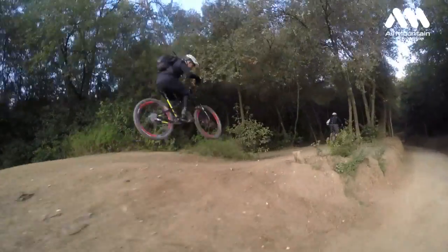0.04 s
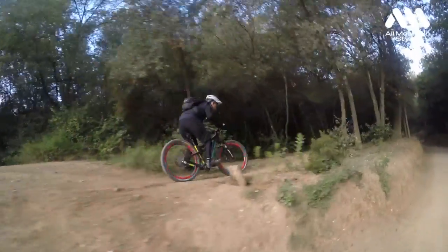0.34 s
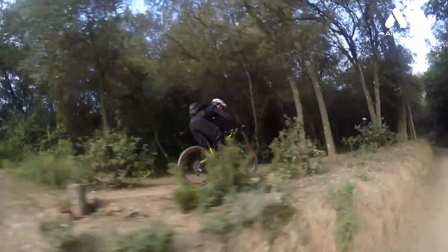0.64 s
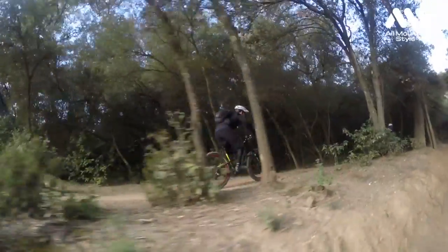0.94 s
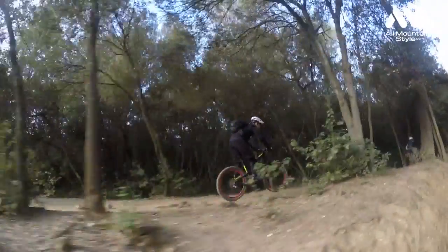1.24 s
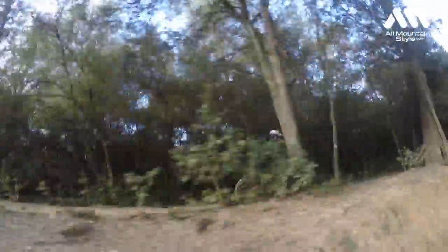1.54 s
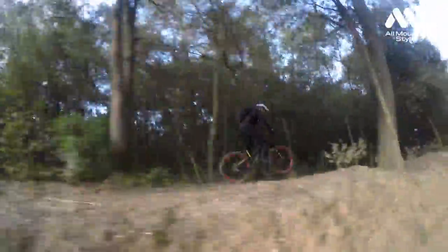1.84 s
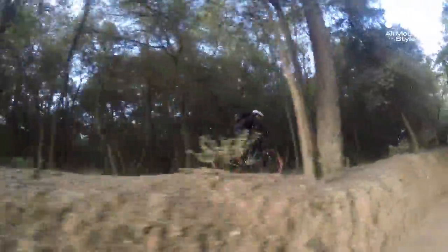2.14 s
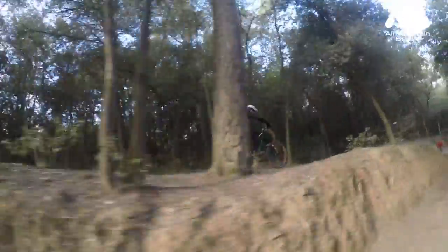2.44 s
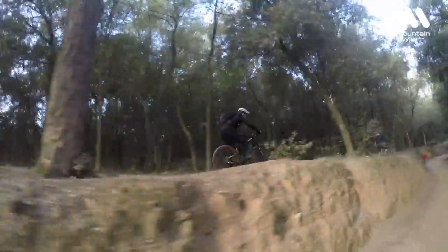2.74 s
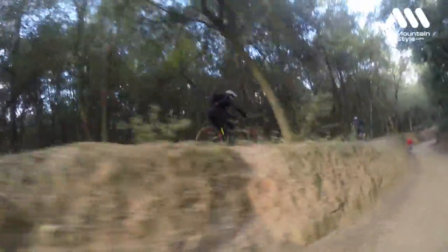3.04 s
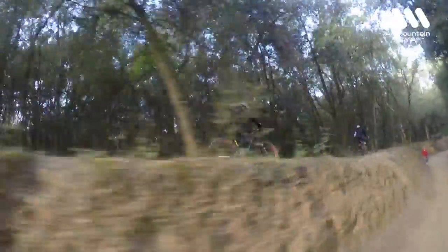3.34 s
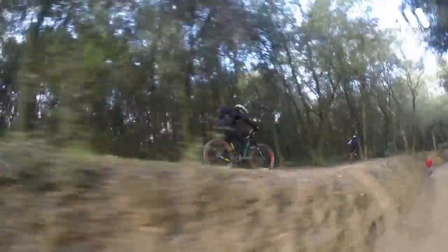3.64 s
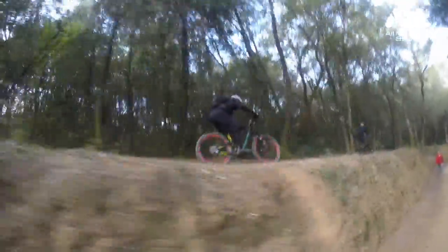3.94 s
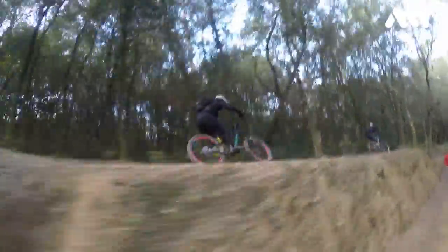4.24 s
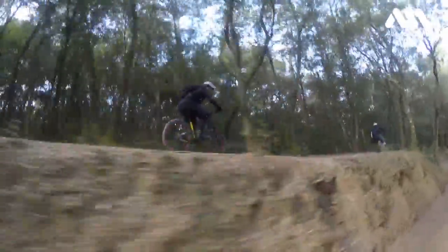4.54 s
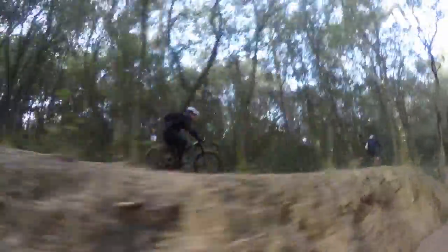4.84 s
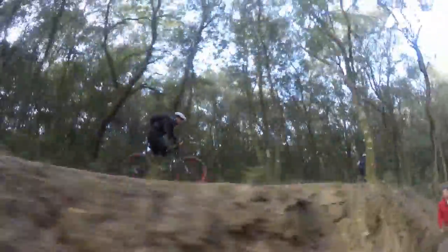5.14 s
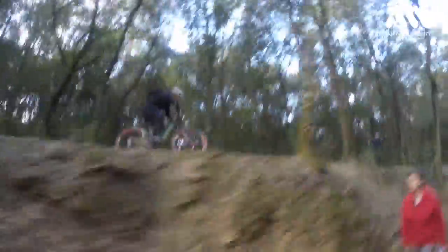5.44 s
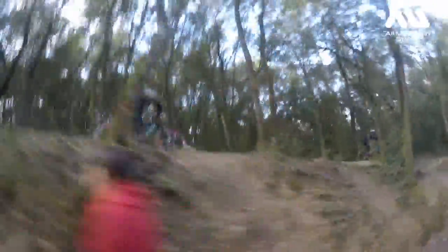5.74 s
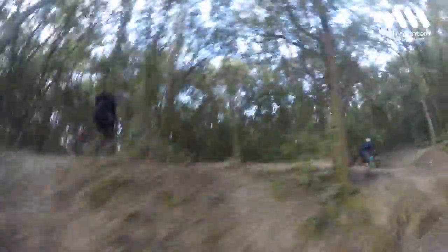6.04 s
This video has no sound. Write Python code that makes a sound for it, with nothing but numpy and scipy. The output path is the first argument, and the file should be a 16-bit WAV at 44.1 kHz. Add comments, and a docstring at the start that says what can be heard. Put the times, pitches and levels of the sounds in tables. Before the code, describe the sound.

Wind buffets a camera on a moving mountain bike as tyres crunch over dry dirt, with small clacks and thin brake squeaks.

```python
"""Mountain bike tyres crunch over dry dirt and spray grit, close to a camera riding on the bike.
The place is a woodland trail; a rider alongside lands a jump and throws up loose soil. Stones tick,
chains and frames clack, and a brake squeaks thinly, with a short echo from the trees. Wind buffets
the camera's microphone, hardest near the end, and its resonant case colours the noise and clatter."""
import sys
import numpy as np
from scipy import signal
from scipy.fft import rfft, irfft
from scipy.io import wavfile

SR = 44100
rng = np.random.default_rng(int(sys.argv[2]) if len(sys.argv) > 2 else 0)


def store_wav(level_fs):
    """Save 16-bit WAV to argv[1]."""
    pcm = np.round(np.clip(np.atleast_2d(level_fs), -1, 1) * 32767)
    wavfile.write(sys.argv[1], SR, pcm.T.astype(np.int16))


N = 269010
TIME = np.arange(N) / SR


def amp(db):
    """Decibels to gain."""
    return 10 ** (np.asarray(db) / 20)


def unit_rms(x):
    """Scales to rms 1."""
    return x / np.sqrt(np.mean(x ** 2) + 1e-20)


def with_energy(x, seconds):
    """Scales a hit to the energy of a sound of rms 1 lasting that many seconds."""
    return x * np.sqrt(seconds * SR / np.sum(x ** 2))


def follow(rows):
    """Gain at every sample from rows of (time [s], level [dB])."""
    return amp(np.interp(TIME, *np.transpose(rows)))


def bump(s, length):
    """A smooth bump of height 1 that peaks at time s."""
    return np.exp(-(2 * (TIME - s) / length) ** 2)


def swells(rows):
    """Smooth bumps of gain from rows of (peak time [s], length [s], level [dB])."""
    return sum(amp(db) * bump(s, length) for s, length, db in rows)


def add(mix, s, sound):
    """Adds a sound at time s."""
    part = mix[max(round(s * SR), 0):][:len(sound)]
    part += sound[:len(part)]


def wander(rate_hz):
    """Smooth random drift of rms 1, moving at up to about rate_hz."""
    lowpass = np.exp(-(np.fft.rfftfreq(N, 1 / SR) / rate_hz) ** 2)
    return unit_rms(irfft(rfft(rng.standard_normal(N)) * lowpass, N))


def grains(per_s, spread_db):
    """Clicks at random times and of random size."""
    size = amp(spread_db * np.minimum(rng.exponential(1, N), 5))
    return unit_rms(size * rng.standard_normal(N) * (rng.random(N) < per_s / SR))


# Resonances and a hollow of the case around the microphone: (frequency [Hz], width [Hz], gain [dB])
CASE_RESONANCES = [(1220, 170, 5), (2137, 330, 5.5), (2458, 99, 4.5), (3457, 57, 5), (4180, 104, 4.5),
                   (4590, 280, -6), (4924, 740, 5.5)]

def through_case(x, spectrum, tilt_db=0):
    """Gives x a source's spectrum, a treble tilt per octave and the resonances of the camera case."""
    bins = np.fft.rfftfreq(16384, 1 / SR)
    hz, levels = np.transpose(spectrum)
    db = np.interp(np.log2(bins + 1), np.log2(hz), levels)
    db += tilt_db * np.log2(np.clip(bins, 2300, 9000) / 4000)
    db += sum(peak / (1 + (2 * (bins - f) / width) ** 2) for f, width, peak in CASE_RESONANCES)
    log_gain = np.log(amp(np.r_[db, db[-2:0:-1]]))
    taps = np.fft.ifft(np.exp(np.conj(signal.hilbert(log_gain)))).real  # minimum phase, so causal
    return signal.oaconvolve(x, taps[:min(len(x), len(bins))])[:len(x)]


def noise(spectrum, flutter=1):
    """Noise of rms 1 heard through the case; flutter is a gain applied before the filter."""
    return unit_rms(through_case(rng.standard_normal(N) * flutter, spectrum))


# Noise floor at the camera: (frequency [Hz], relative level [dB])
HISS_SPECTRUM = [(200, -8), (4000, 21), (8000, -32), (10700, 6), (12000, -10), (12800, 14.5), (14000, 4),
                 (15200, 6)]

def hiss():
    """A faint, steady hiss lies under everything."""
    return amp(-63) * noise(HISS_SPECTRUM)


def woods(x, wet_db, t60, blur):
    """Trunks and banks throw a sound back; with blur, riding past them smears its pitch."""
    t = np.arange(SR // 2) / SR
    taps = rng.standard_normal(len(t)) * amp(-60 * t / t60) * (1 - np.exp(-t / 0.0042))
    echo = signal.fftconvolve(x, taps / np.linalg.norm(taps))[:N]
    return amp(wet_db) * echo * (1 + blur * wander(520)) / np.hypot(1, blur)


# Air over the microphone, growing as the bike gathers speed: (time [s], relative level [dB])
AIRFLOW = [(0, -58.5), (1.0, -57), (2.3, -60), (3.15, -58.5), (4.3, -48), (5.2, -53), (6.1, -41.5)]
# Gusts right on the microphone: (peak time [s], length [s], level [dB])
GUSTS = [(0.05, 0.057, -27.5), (.135, .035, -30), (.215, 0.032, -29.5), (0.315, 0.1, -24.5),
         (.465, 0.027, -31), (.585, 0.06, -30.5), (.66, 0.05, -25), (.75, .05, -27.5), (.84, .04, -31.5),
         (0.975, 0.082, -21.5), (1.08, 0.065, -26), (1.33, .03, -29.5), (1.425, 0.023, -29),
         (1.555, 0.054, -25.5), (1.68, 0.06, -31.5), (1.85, 0.094, -30.5), (1.98, 0.13, -31),
         (2.15, 0.17, -29.5), (2.34, 0.073, -25), (2.49, 0.051, -26), (2.6, 0.063, -26.5),
         (2.69, 0.15, -28.5), (2.83, 0.086, -31), (3.0, 0.033, -28.5), (3.085, 0.073, -22.5),
         (3.28, 0.18, -23), (3.47, 0.18, -19.5), (3.61, 0.085, -27), (3.79, 0.041, -28.5),
         (3.905, 0.019, -25), (4.02, .05, -25), (4.115, 0.13, -19), (4.275, .07, -25), (4.43, 0.036, -27.5),
         (4.57, 0.067, -23), (4.675, 0.063, -23), (4.92, 0.09, -25), (5.02, .05, -22), (5.14, 0.1, -20.5),
         (5.395, 0.24, -13.5), (5.54, 0.061, -20), (5.635, 0.075, -19), (5.77, 0.14, -15.5),
         (5.93, 0.088, -17.5), (6.045, 0.077, -18.5)]
# Lulls in the steady wind; a negative depth is a surge: (centre time [s], length [s], depth [dB])
LULLS = [(1.45, 0.38, 5.5), (1.75, .1, -3.5), (2.25, 0.069, 1), (2.95, .1, 2), (3.13, .06, 12),
         (3.803, 0.48, 7), (4.207, 0.055, 7), (4.425, 0.18, 7), (4.79, 0.11, 1), (5.265, .05, 4),
         (5.856, 0.057, 11)]
# Strength of the turbulence at the microphone: (time [s], relative level [dB])
TURBULENCE_LEVEL = [(0, -55), (.4, -53), (.6, -54.5), (1.05, -52), (1.18, -50), (1.4, -53), (1.56, -44.5),
                    (1.68, -56.5), (1.9, -48), (2.45, -50.5), (2.53, -44.5), (2.62, -50.5), (2.97, -49.5),
                    (3.1, -54.5), (3.5, -49.5), (3.92, -48), (4.12, -50.5), (4.45, -46), (4.65, -49.5),
                    (4.9, -48.5), (5.05, -47), (5.45, -46.5), (5.75, -45.5), (6.05, -45.5)]
# Slow swirls and lumpy turbulence at the microphone: (frequency [Hz], relative level [dB])
SWIRL_SPECTRUM = [(10, -23), (22, -10), (29, 9), (37, 9), (46, -12), (60, -9), (150, -105)]
TURBULENCE_SPECTRUM = [(25, -13.5), (50, -1), (75, 1.5), (100, -5), (150, -14), (220, -18.5), (330, -28),
                       (600, -38), (1500, -35), (5000, -85)]

def wind(shed_hz=18, shed_jitter=0.15):
    """Eddies shed by the camera rock the microphone, swell in gusts, ease in lulls and break up."""
    flow, gusts = unit_rms(follow(AIRFLOW)), swells(GUSTS)
    calm = amp(-sum(db * bump(s, length) for s, length, db in LULLS))
    sway_hz = shed_hz * np.exp(shed_jitter * wander(9.06))
    sway = unit_rms(np.sin(2 * np.pi * np.cumsum(sway_hz) / SR))
    swirl = noise(SWIRL_SPECTRUM)
    turbulence = noise(TURBULENCE_SPECTRUM, flutter=amp(wander(23)))
    sway_gain = np.hypot(amp(-30.5) * flow * calm, gusts)
    swirl_gain = np.hypot(amp(-42) * flow ** 0.21 * calm, amp(-17) * gusts)
    turbulence_gain = amp(1.52) * follow(TURBULENCE_LEVEL) * calm ** 0.3
    return sway_gain * sway + swirl_gain * swirl + turbulence_gain * turbulence


def disc(hz, edge_s=0.0019):
    """The brake disc sings along a pitch curve, starting and stopping quickly."""
    edges = signal.windows.tukey(len(hz), 2 * edge_s * SR / len(hz))
    return unit_rms(np.sin(2 * np.pi * np.cumsum(hz) / SR) * edges)


# Thin brake squeaks among the trees: (time [s], length [s], level [dB], starting pitch [Hz])
SQUEAKS = [(2.747, 0.014, -41.5, 14100), (2.786, 0.017, -40.5, 14040), (2.867, .018, -53, 13950),
           (2.903, 0.022, -42.5, 13900), (2.973, .011, -50, 14200), (3.151, 0.011, -49, 14200),
           (3.246, 0.021, -40.5, 14000), (3.462, 0.016, -40, 13700), (3.482, 0.022, -36, 14170),
           (3.532, .027, -36.5, 14000), (3.625, 0.026, -38.5, 14100), (5.035, .022, -54, 14250)]
# The pad rasping on the disc without catching: (time [s], length [s], peak level [dB])
RASPS = [(3.16, 0.29, -46.5), (5.04, 0.089, -63)]

def brake(grip_hz=14400, settle_s=0.013, rasp_hz=14200, rasp_fade_db=15):
    """The pad catches the disc in squeaks that climb as it grips; where it slips, it rasps."""
    out, waver, chatter = np.zeros(N), wander(400), amp(3 * wander(60))
    for s, length, db, start_hz in SQUEAKS:
        t = np.arange(round(length * SR)) / SR
        hz = grip_hz + (start_hz - grip_hz) * np.exp(-(t / settle_s) ** 2)
        add(out, s, amp(db) * disc(hz + 95 * waver[round(s * SR):][:len(t)]))
    for s, length, db in RASPS:
        during = (TIME >= s) & (TIME < s + length)
        swell = amp(db - rasp_fade_db * abs(np.linspace(-1, 1, during.sum())))
        add(out, s, swell * chatter[during] * disc(rasp_hz + 260 * waver[during]))
    return out


# Modes of the bike's frame: (frequency [Hz], gain against the contact [dB], t60 [s])
FRAME_MODES = [(2310, -18, .02), (2930, 3, 0.016), (3950, -5, 0.021), (4880, -3, 0.0079),
               (10900, -13, .007)]
# A clack on the bike, heard from the camera: (frequency [Hz], relative level [dB])
CLACK_SPECTRUM = [(200, -21.5), (700, -21), (1500, -25), (2600, -0.5), (4800, 1), (6500, -5), (8500, -22),
                  (12000, -22.5), (15000, -32)]

def frame_clack(contact, tilt_db):
    """A contact and the short frame modes that it rings, heard through the case."""
    out = contact
    for hz, db, t60 in FRAME_MODES:
        radius = np.exp(-np.log(1000) / (t60 * SR))
        pole = radius * np.exp(2j * np.pi * hz / SR)
        out = out + amp(db) * 2 * signal.lfilter([1 - radius], [1, -pole], contact).real
    return through_case(out, CLACK_SPECTRUM, tilt_db)


def chain_rattle(level_db=-73, decay_s=0.0029):
    """The chain ticks lightly against the frame at random as the trail shakes it."""
    t = np.arange(1024) / SR
    shakes = signal.oaconvolve(abs(grains(per_s=22, spread_db=-1.5)), np.exp(-t / decay_s))[:N]
    return amp(level_db) * unit_rms(frame_clack(shakes * rng.standard_normal(N), tilt_db=11))


# Knocks of chain and frame, close by: (time [s], level [dB], decay [s], brightness [dB/octave])
KNOCKS = [(0.2945, -33.5, 0.0026, 1.5), (0.3713, -41, 0.0086, -4), (.392, -44.5, 0.022, -6),
          (.402, -35, 0.0014, 5), (.427, -46, .003, 3), (0.459, -28, 0.0022, 6.5), (1.3806, -44, .001, -24),
          (1.388, -36, 0.002, -27), (1.481, -51, 0.0018, -17), (1.4827, -40, 0.0025, -18),
          (1.515, -46, 0.0015, -13), (1.5192, -40, .003, -18), (1.8777, -43, 0.0018, -27),
          (2.351, -42, 0.0035, -24), (2.461, -43, 0.0063, -22), (3.017, -42, 0.0031, -25),
          (3.3419, -34.5, 0.0026, -24), (3.585, -37.5, .003, -34), (5.566, -38, 0.0025, -20),
          (5.861, -39, 0.004, -24)]

def knocks(rattle=0.055, rattle_s=0.015):
    """Each knock is a brief burst of contacts that rings the frame and dies into a faint rattle."""
    out, t = np.zeros(N), np.arange(4096) / SR
    for s, db, decay_s, tilt_db in KNOCKS:
        burst = rng.standard_normal(len(t)) * (np.exp(-t / decay_s) + rattle * np.exp(-t / rattle_s))
        add(out, s, amp(db) * with_energy(frame_clack(burst, tilt_db), decay_s))
    return out


# A stone or chain link striking near the camera: (frequency [Hz], relative level [dB])
TICK_SPECTRUM = [(1000, -21), (3000, 5), (5000, 7), (6800, 6), (8500, -3.5), (11500, -10), (15000, -6)]

def tick(decay_s, tilt_db=0):
    """A small, hard contact gives one dry, bright burst of noise."""
    t = np.arange(2048) / SR
    burst = rng.standard_normal(len(t)) * np.exp(-t / decay_s)
    return with_energy(through_case(burst, TICK_SPECTRUM, tilt_db), decay_s)


# Chain on frame, close by: (time [s], level [dB], pitch [Hz], click against the ping [dB])
CHAIN_TAPS = [(3.2415, -44, 4850, -9), (3.483, -48, 4850, 8), (3.6706, -46, 5100, 3),
              (3.7394, -49, 4820, -7), (5.6155, -48.5, 4750, -1), (5.7743, -42, 4860, -8),
              (5.8331, -46.5, 5030, 0), (5.869, -53, 4870, 4), (5.9, -47.5, 4800, 3.5)]

def chain_taps(ring_s=0.0041, rise_s=0.00081):
    """A harder tap of the chain makes a dry click and a short metallic ping."""
    out, t = np.zeros(N), np.arange(2048) / SR
    envelope = np.exp(-t / ring_s) * (1 - np.exp(-t / rise_s))
    for s, db, hz, click_db in CHAIN_TAPS:
        ping = np.sqrt(2) * np.sin(2 * np.pi * hz * t) * envelope
        add(out, s, amp(db) * (ping + amp(click_db) * tick(decay_s=0.0023)))
    return out


# Small stones on the trail below the camera: (time [s], level [dB], brightness [dB/octave])
STONES = [(0.166, -47, -5), (.437, -51, 8), (.5253, -52, -1), (0.582, -49.5, -5), (.8515, -57, 13),
          (1.12, -47, -2), (1.1505, -52, 10), (2.2025, -52, 1), (3.264, -51, 4), (3.3487, -52, 12),
          (3.714, -52, 6), (3.9784, -50, 1), (5.7659, -56, 2), (5.921, -45, -7)]

def stones():
    """Each stone flicked off the tread ticks once."""
    out = np.zeros(N)
    for s, db, tilt_db in STONES:
        add(out, s, amp(db) * tick(decay_s=0.0031, tilt_db=tilt_db))
    return out


# Soil off the tyres of the rider alongside: (frequency [Hz], relative level [dB])
DUST_SPECTRUM = [(2400, -13), (3100, 5.5), (3550, -26), (4400, -8), (4900, 0), (5300, -6.5), (6000, -17),
                 (8000, -19), (10500, -18), (15000, -19)]

def dust(landing_s=0.19, peak_db=-56, rise_db_per_s=22, fall_db_per_s=6):
    """Loose dry soil thrown by the landing patters down and thins out."""
    since = TIME - landing_s
    gain = amp(peak_db + np.minimum(rise_db_per_s * since, -fall_db_per_s * since))
    return gain * unit_rms(through_case(grains(per_s=3400, spread_db=1.5), DUST_SPECTRUM))


# Tyres thumping into the trail: (peak time [s], length [s], level [dB])
THUMPS = [(.38, 0.06, -58.5), (2.2, 0.15, -62.5), (3.47, 0.11, -60), (4.29, 0.12, -61),
          (5.41, 0.075, -54.5), (5.74, .22, -62.5)]
# A tyre casing's dull thud, heard from the bike: (frequency [Hz], relative level [dB])
THUMP_SPECTRUM = [(100, -16), (250, 7), (450, 3.5), (800, -2), (1400, -2), (2500, -17), (6000, -50)]

def thumps():
    """The tyre casings thud as they are pressed into the ground."""
    return swells(THUMPS) * noise(THUMP_SPECTRUM)


# Crushing of dirt and roar of the knobs, just below the camera: (time [s], relative level [dB])
CRUSH_LEVEL = [(0.0, -52.5), (0.13, -50.5), (0.37, -46.5), (0.6, -50.5), (.8, -49.5), (1.33, -50.5),
               (1.42, -48), (1.56, -45.5), (1.72, -49), (1.97, -44.5), (2.11, -45), (2.23, -44.5),
               (2.37, -45), (2.54, -47), (2.7, -44), (2.9, -43), (3.5, -44), (3.68, -41.5), (3.95, -45),
               (4.3, -43), (4.64, -43), (4.93, -44.5), (5.16, -42.5), (5.28, -45.5), (5.57, -42.5),
               (5.75, -43.5), (6.05, -45)]
ROAR_LEVEL = [(0, -67), (.2, -60.5), (.8, -61), (1.25, -58.5), (1.57, -54.5), (1.75, -55), (2.18, -55),
              (2.5, -58), (2.92, -54.5), (3.4, -56.5), (3.7, -54), (3.98, -54.5), (4.3, -54.5), (4.9, -55),
              (5.5, -54), (6.05, -53)]
# Bites into loose pebbles and sprays of grit along the trail: (peak time [s], length [s], level [dB])
PEBBLE_BITES = [(.2, 0.1, -52), (.3, .025, -47.5), (.385, 0.054, -47), (.463, .016, -44.5),
                (.58, 0.18, -52), (1.96, 0.13, -52), (2.24, .05, -52), (2.89, .06, -44),
                (3.015, 0.044, -39), (3.15, .04, -55), (3.34, 0.056, -52), (3.585, 0.044, -44.5),
                (3.655, .055, -45), (3.74, .06, -51), (3.85, 0.099, -46), (3.97, 0.035, -51),
                (4.06, 0.023, -41), (4.315, 0.054, -48.5), (4.455, 0.05, -49), (4.66, .08, -49),
                (5.12, 0.067, -52), (5.57, 0.045, -47)]
GRIT_SPRAYS = [(.43, 0.18, -53), (.7, 0.16, -58), (2.26, 0.23, -57.5), (4.4, 0.45, -62.5),
               (5.85, 0.15, -60)]
# Knobs, crumbs, pebbles and grit at close range: (frequency [Hz], relative level [dB])
ROAR_SPECTRUM = [(120, -21), (350, -10), (650, -12.5), (1000, -8.5), (1400, -9), (2200, -12.5), (4000, -10),
                 (9000, -39)]
CRUNCH_SPECTRUM = [(600, -27), (1300, -11.5), (1900, -1), (2500, -0.5), (3100, -3), (4200, -17),
                   (5500, -17.5), (8000, -35), (15000, -29.5)]
PEBBLE_SPECTRUM = [(1200, -32.5), (1900, -9.5), (2120, 6), (2350, -4), (3100, -6.5), (4500, -38)]
GRIT_SPECTRUM = [(1500, -7.5), (3000, -4.5), (5000, 0), (6600, 1), (8000, -7.5), (11000, -12), (15000, -30)]

def tyres(bump_db=0.68, clump_db=0.5):
    """Knobs roar on packed dirt, crush crumbs, pop pebbles and fling grit; bumps vary the load."""
    work, speed = unit_rms(follow(CRUSH_LEVEL)), unit_rms(follow(AIRFLOW))
    load = amp(bump_db * wander(26))
    roar = amp(-1) * follow(ROAR_LEVEL) * noise(ROAR_SPECTRUM)
    crumbs = unit_rms(through_case(grains(per_s=9000, spread_db=1.5), CRUNCH_SPECTRUM))
    pebbles = unit_rms(through_case(grains(per_s=900, spread_db=-0.5), PEBBLE_SPECTRUM))
    clumps = grains(per_s=9000, spread_db=-1.5) * amp(clump_db * wander(70))
    grit = unit_rms(through_case(clumps, GRIT_SPECTRUM))
    pebble_gain = np.hypot(amp(-56) * work, swells(PEBBLE_BITES))
    grit_gain = np.hypot(amp(-60) * work ** 0.15 * speed ** 0.31, swells(GRIT_SPRAYS))
    return load * (roar + amp(-47) * work * crumbs + pebble_gain * pebbles + grit_gain * grit)


def scene():
    """The ride in mono from the bike; only the clatter and the brake echo from the trees."""
    clatter = knocks() + stones() + chain_rattle() + chain_taps()
    squeal = brake()
    echoes = woods(clatter, wet_db=-19, t60=0.23, blur=0)
    echoes += woods(squeal, wet_db=-10, t60=0.25, blur=0.62)
    return (hiss() + echoes + wind() + squeal + clatter + tyres() + thumps() + dust())[None]


def record(dry, cutoff_hz=15400):
    """The camera cuts off the highest treble."""
    lowpass = signal.firwin(401, cutoff_hz, window=("kaiser", 9), fs=SR)
    return signal.oaconvolve(dry, lowpass[None], "same")


dry = scene()
out = record(dry)
store_wav(out)
```